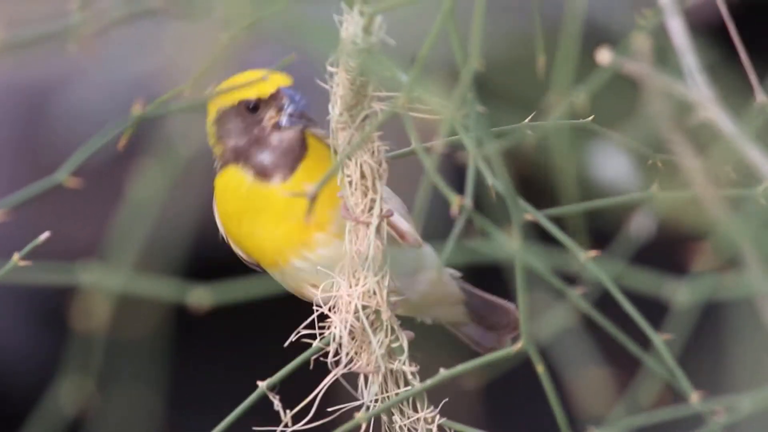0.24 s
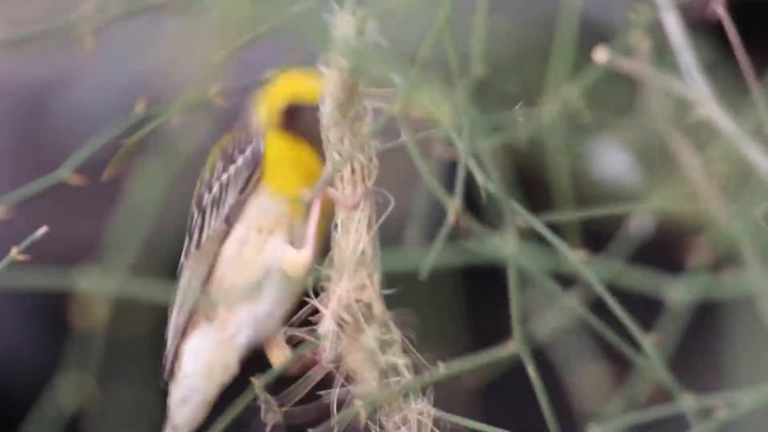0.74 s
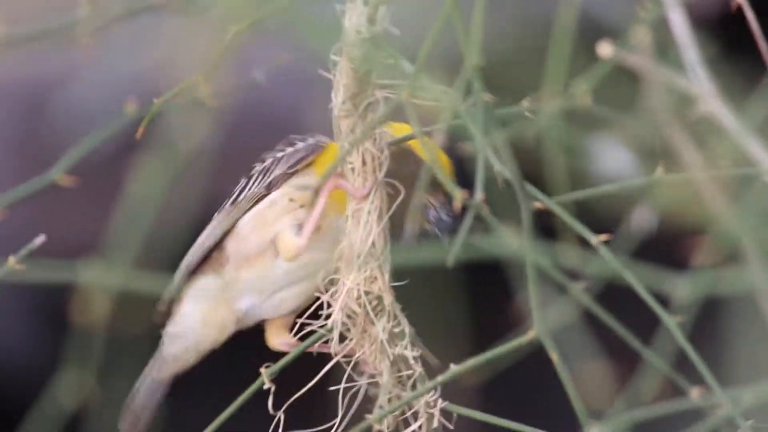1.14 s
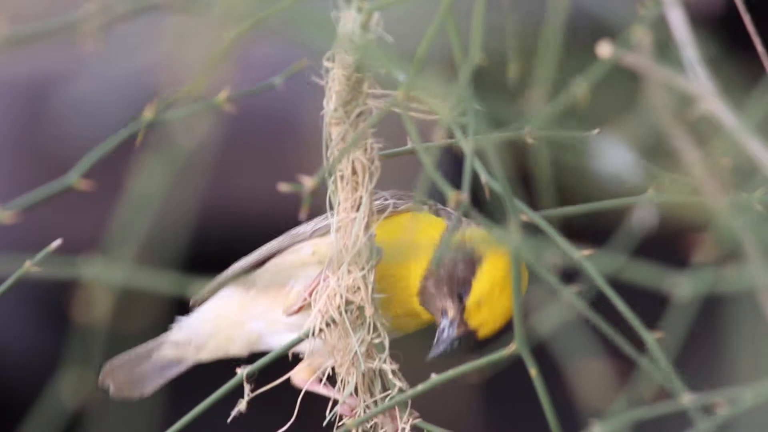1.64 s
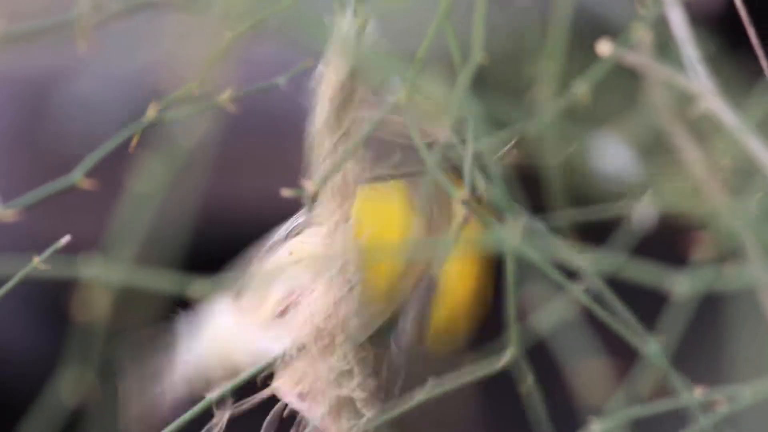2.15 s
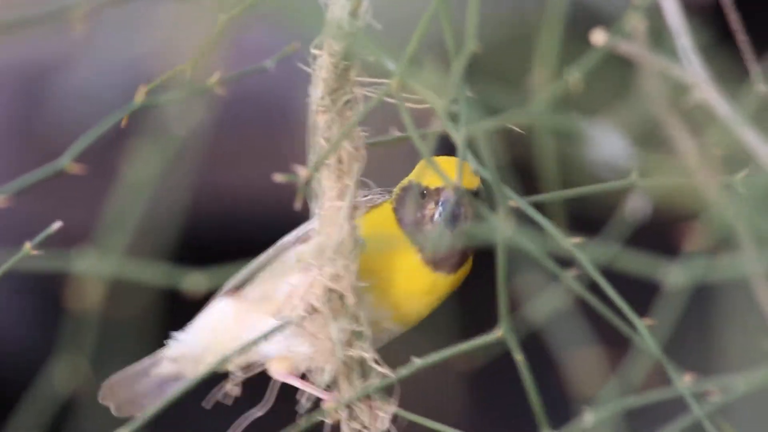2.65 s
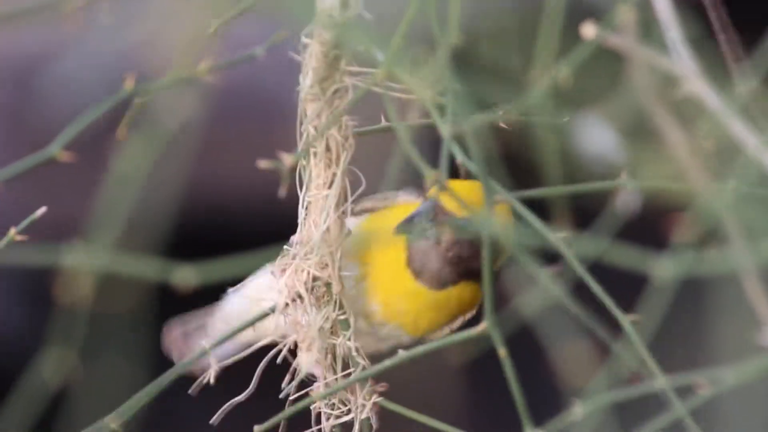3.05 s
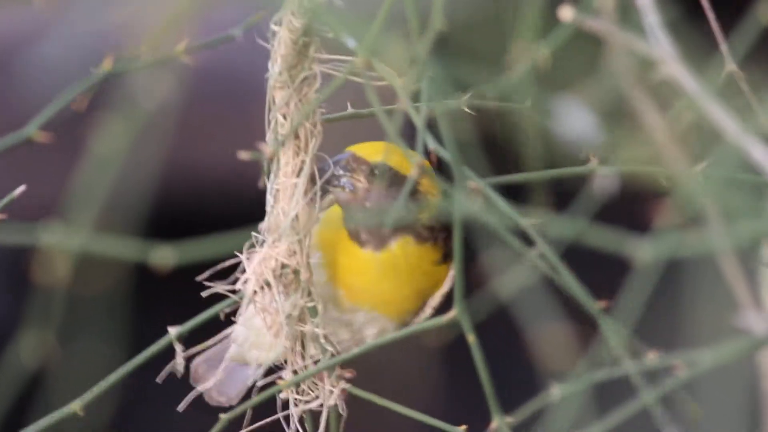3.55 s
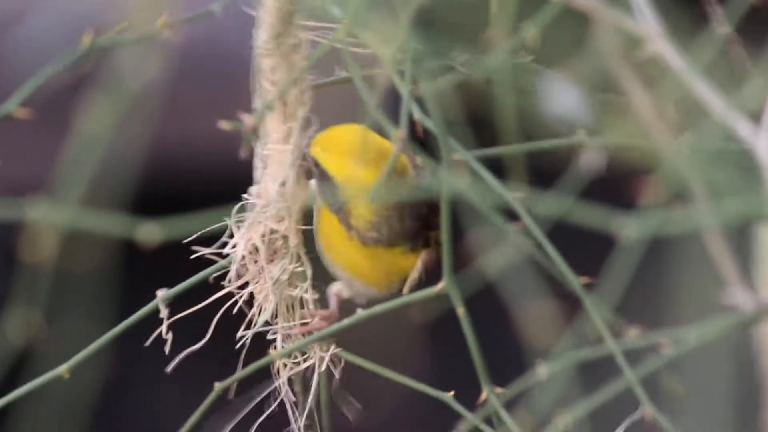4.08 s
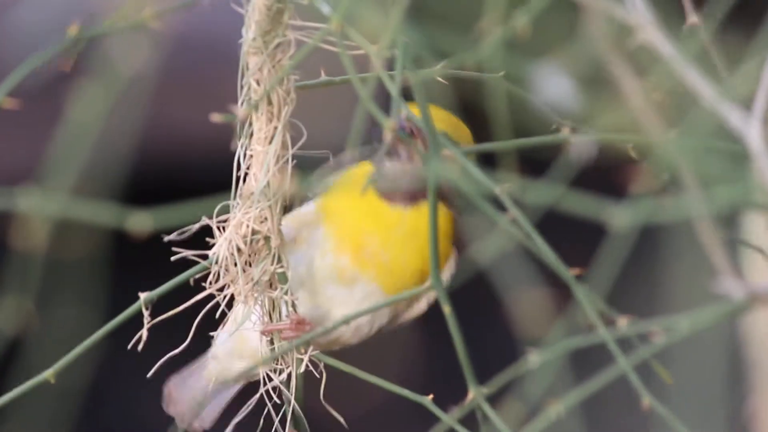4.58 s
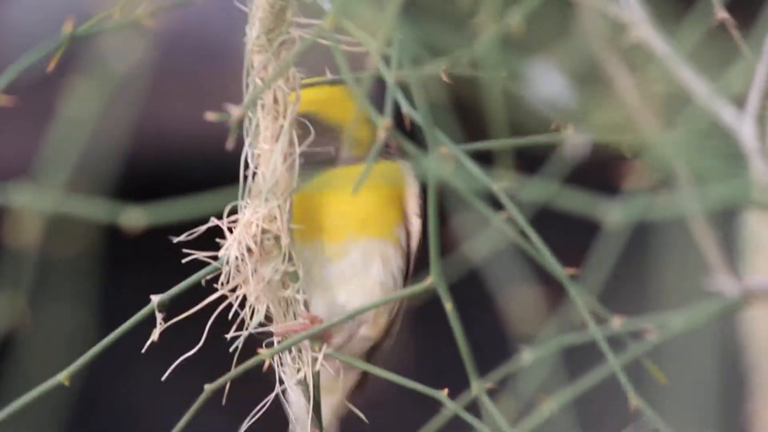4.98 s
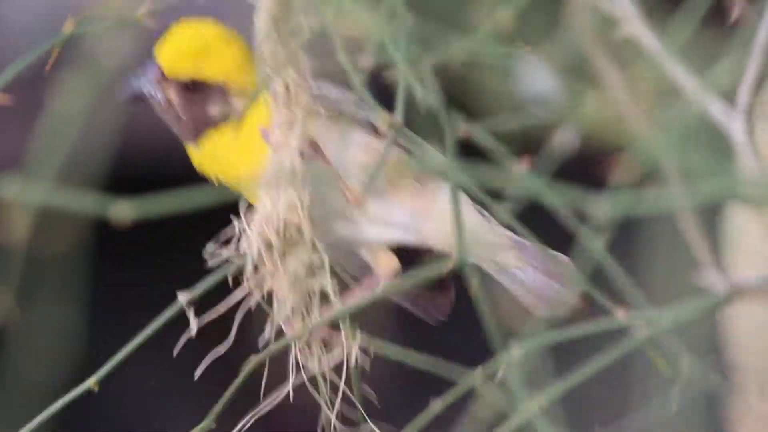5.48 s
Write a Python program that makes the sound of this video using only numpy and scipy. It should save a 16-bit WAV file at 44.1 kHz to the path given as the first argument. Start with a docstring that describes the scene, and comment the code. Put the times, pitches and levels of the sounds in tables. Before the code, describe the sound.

Outdoors among thorny bushes, two small birds repeat very short, buzzy zigzag chirps over a distant chattering flock and a wash of trickling water with small plops. A trilled whistle comes just before three seconds, then rasps, a thin wheezy song and falling whistles crowd in. Stereo microphones, close birds slightly left, light echo from foliage.

```python
"""Zigzag chirps over a wash of trickling water: a colony of weaver birds in thorn bushes, at two microphones.
Two birds repeat the zigzags, others give thin notes, trilled and falling whistles, rasps and a wheezy song.
Calls are pitch curves sung by a tone; rasp and wheeze are irregular slaps filtered by resonances.
A far flock chatters behind, bubbles ring in the water, wind rumbles, and foliage and banks echo the calls."""
import sys
import numpy as np
from scipy import signal
from scipy.fft import rfft, irfft
from scipy.io import wavfile
from scipy.ndimage import uniform_filter1d

SR = 44100
rng = np.random.default_rng(int(sys.argv[2]) if len(sys.argv) > 2 else 0)


def field_ratio(decibels):
    """Amplitude ratio for a level in dB (20 dB per decade); scalars and array-likes work."""
    return 10 ** (np.asarray(decibels, dtype=float) / 20)


def waveform_to_disk(signal):
    """Save audio, clipped to [-1, 1], as 16-bit WAV at the path in sys.argv[1]."""
    frames = np.transpose(np.atleast_2d(signal))
    scaled = np.clip(frames, -1, 1) * 32767
    samples = np.round(scaled).astype(np.int16)
    wavfile.write(sys.argv[1], SR, samples)


N = 252252
T = np.arange(N) / SR

# Turning points of one zigzag chirp, shared by the further caller and the flock, before each call is varied:
# (time from the first peak [s], pitch [Hz], relative level [dB])
CHIRP_ZIGZAG = [(-.007, 3420, -6), (0, 4950, -17), (.008, 4510, -2), (.0105, 3800, -1.5), (.016, 4226, 2),
                (.020, 3950, -4.5), (.023, 4990, -10.5), (.030, 3150, -3.5), (.035, 3800, -9.5),
                (0.047, 3140, -2.5)]


def level(x, db):
    """Root-mean-square normalisation: scale to an rms level in dB."""
    return x * field_ratio(db) / np.sqrt(np.mean(x ** 2))


def band(x, hz, width):
    """Second-order resonance with unit gain at its centre and a bandwidth in Hz."""
    return signal.lfilter(*signal.iirpeak(hz, hz / width, SR), x)


def wobble(rate):
    """Low-passed noise: smooth chance of spread 1 that changes about rate times a second."""
    window = max(int(SR / rate), 1)
    x = uniform_filter1d(uniform_filter1d(rng.standard_normal(N), window), window)
    return x / x.std()


def place(x, pan_db, lag=0):
    """Interaural cues: left minus right level in dB, and a delay of the left microphone in samples."""
    left = np.roll(x, lag) * field_ratio(pan_db / 2)
    right = x * field_ratio(-pan_db / 2)
    return np.array([left, right])


def add(out, s, hz, db, overtone_db=(), edge_s=0.00095, shape=1):
    """Frequency modulation: sing a syrinx tone along a curve of pitch and level into out, with soft edges."""
    i = np.arange(max(int(s[0] * SR), 0), min(int(s[-1] * SR), N))
    t = i / SR
    pitch = uniform_filter1d(np.interp(t, s, hz), size=110, mode="nearest")  # muscles round the turns
    phase = 2 * np.pi * np.cumsum(pitch) / SR
    tone = np.sin(phase)
    for k, overtone in enumerate(overtone_db):
        # the windpipe passes overtones best when the pitch is low
        tone = tone + field_ratio(overtone) * (4000 / pitch) ** 2 * np.sin((k + 2) * phase)
    edge = np.clip(np.minimum(t - s[0], s[-1] - t) / edge_s, 0, 1)
    gain = np.sqrt(2) * field_ratio(np.interp(t, s, db))  # sine amplitude from rms level
    out[i] += tone * edge * gain * np.broadcast_to(shape, N)[i]


def slaps(rate):
    """Aperiodic excitation: random closures of a strained syrinx, rate per second on average, over faint noise."""
    chance = rng.random((2, N))
    closures = (chance[0] < rate / SR) * (chance[1] - .5)
    return closures + 0.072 * rng.standard_normal(N)


def twigs(x, smear_db):
    """Short-range scattering: close twigs spread a call over a few milliseconds."""
    decay_s = .0045
    t = np.arange(int(4 * decay_s * SR)) / SR
    scatter = rng.standard_normal(len(t)) * np.exp(-t / decay_s)
    scatter = field_ratio(smear_db) * scatter / np.sqrt(np.sum(scatter ** 2))
    return x + signal.fftconvolve(x, scatter)[:N]


def foliage(x, t60_s, tail_db, echo_db):
    """Reverberation: discrete echoes and an exponentially decaying scatter, partly alike left and right, dulled."""
    # banks and trunks: (delay [s], level before echo_db is added [dB])
    reflections = [(0.033, -8.5), (0.061, -5.5), (0.1, -8.5)]
    t = np.arange(SR) / SR
    common, own = rng.standard_normal(SR), rng.standard_normal((2, SR))
    decay = np.exp(-np.log(1000) * t / t60_s)
    onset = np.minimum(t / 0.0032, 1)
    tail = (common + 0.78 * own) * decay * onset
    tail = field_ratio(tail_db) * tail / np.sqrt(np.sum(tail ** 2, axis=1, keepdims=True))
    for s, db in reflections:
        tail[:, int(s * SR)] += field_ratio(db + echo_db)
    wet = signal.fftconvolve(x, tail, axes=1)[:, :N]
    return signal.sosfilt(signal.butter(1, 7000, fs=SR, output="sos"), wet)


def murmur(db):
    """Partial coherence: shaped noise of water and air, partly alike at both microphones, gently swelling."""
    # spectrum of the wash: (frequency [Hz], relative density [dB])
    spectrum = [(18, -53), (30, -16), (187, -7), (324, -12.5), (518, -14), (1330, -5.5), (2620, -4),
                (3230, -4), (4090, 2.5), (4420, -16.5), (5450, -6), (9940, -18), (15500, -33.5)]
    spectrum_hz, spectrum_db = np.transpose(spectrum)
    f = np.maximum(np.fft.rfftfreq(N, 1 / SR), 1)
    gain = field_ratio(np.interp(np.log(f), np.log(spectrum_hz), spectrum_db))
    apart = gain * (f / 2500) ** 0.32  # the treble differs more between the microphones
    mid, left, right = (irfft(rfft(rng.standard_normal(N)) * g, N) for g in (gain, apart, apart))
    wash = place(mid, -6.0) + 1.17 * np.array([left, right])
    swell = field_ratio(.8 * wobble(8) + .8 * wobble(2))
    return level(wash, db) * swell


def thumps():
    """Wind pressure: low resonant noise and two Gaussian puffs, of opposite polarity at the two microphones."""
    # puffs before the microphone gains: (time [s], envelope peak [dB], frequency [Hz])
    puffs = [(0.873, -25.5, 91.4), (1.919, -42, 59)]
    out = np.zeros(N)
    for at, db, hz in puffs:
        t = T - at
        out += field_ratio(db) * np.sin(2 * np.pi * hz * t) * np.exp(-(t / 0.0092) ** 2)
    rumble = band(band(rng.standard_normal(N), 44, 50), 44, 50)
    out += level(rumble, -66)
    return np.array([1.4 * out, -.7 * out])


def bubble(count, db, hz, rise, length):
    """Bubble resonance: a shrinking air pocket has a quick start, a rising pitch and a dying ring."""
    t = np.arange(count) / SR
    f = hz * 2 ** (-rise * np.exp(-2.2 * t / length))
    envelope = np.minimum(t / 0.0027, 1) * np.exp(-(t / length) ** 3)
    return field_ratio(db) * np.sin(2 * np.pi * np.cumsum(f) / SR) * envelope


def water(count=300):
    """Superposed bubble resonances: listed loud bubbles and a random trickle of mostly fainter ones."""
    # (time [s], level before onset and decay [dB], last pitch [Hz], rise [octaves], ring length [s])
    loud_bubbles = [(.334, -26, 887, 0.72, 0.0068), (.858, -28.5, 947, 0.75, 0.0056),
                    (1.352, -24.5, 838, 0.34, 0.0057), (1.48, -40, 396, 0.14, 0.042),
                    (1.535, -42.5, 886, 1.02, 0.048), (2.045, -49.5, 595, 0.1, 0.082),
                    (2.328, -28.5, 1070, 2.1, 0.021), (2.375, -36.5, 965, 0.12, 0.044),
                    (2.468, -32.5, 356, 0.061, 0.018), (3.787, -31.5, 962, 0.59, 0.0094),
                    (3.828, -38.5, 629, 0.43, 0.039), (3.955, -42, 837, 0.175, 0.05),
                    (4.285, -27.5, 710, 2.7, 0.0036), (4.666, -28, 900, 0.24, 0.0044),
                    (5.006, -35.5, 585, 1.25, 0.007), (5.497, -28, 685, 0.93, 0.0037),
                    (5.599, -23, 842, 0.42, 0.0032)]
    bubbles = list(loud_bubbles)
    for a, b, c, d in rng.random((count, 4)):
        bubbles.append((a * N / SR, -53 + 13 * b ** 3, 400 * 2 ** (2.05 * c), 0.739 * d, 0.0094 + 0.0249 * d ** 2))
    out, size = np.zeros(N + SR), SR // 6
    for at, *row in bubbles:
        start = int(at * SR)
        out[start:start + size] += bubble(size, *row)
    return out[:N]


def flock(count=480):
    """Superposition of many voices: zigzags at random moments, pitches and lengths merge into chatter."""
    # loudness course before the paths to the microphones: (time [s], level [dB])
    course = [(0, -35.5), (.3, -34), (.55, -35), (1.5, -35.5), (1.9, -40.5), (2.4, -31.5), (2.7, -38),
              (3.4, -33.5), (4.5, -30), (5.0, -27.5), (5.6, -27.5), (5.72, -30)]
    # weight of a voice by its pitch: (frequency [Hz], gain [dB])
    colour = [(2500, -6.5), (3100, -2), (4100, 0), (4800, 6.5), (6200, 12), (9000, -19)]
    out, (s, hz, db) = np.zeros((2, N)), np.transpose(CHIRP_ZIGZAG)
    colour_hz, colour_db = np.transpose(colour)
    for at, pitch, stretch, size, side in rng.random((count, 5)):
        f = hz * (.85 + .3 * pitch ** 2)
        weight_db = np.interp(np.log(f), np.log(colour_hz), colour_db)
        add(out[int(side > .5)], at * N / SR + s * (.7 + .7 * stretch), f, .5 * db + 4 * size + weight_db)
    return level(out, 0) * field_ratio(np.interp(T, *np.transpose(course)))


def scolds():
    """Broadband resonance: irregular slaps rasp through an open beak, dulled by leaves."""
    # harsh rasps: (start [s], length [s], level before gating and dulling [dB], centre [Hz])
    rasps = [(3.016, 0.086, -30.5, 6470), (3.196, 0.14, -34, 7000), (3.199, 0.15, -36.5, 2200),
             (3.427, 0.092, -30, 5300), (3.61, 0.12, -30.5, 5600), (3.8, 0.12, -31.5, 5470),
             (4.027, 0.1, -34.5, 6040), (4.592, 0.07, -25.5, 5100), (4.923, 0.049, -28.5, 6280),
             (5.136, 0.14, -30.5, 6010), (5.31, 0.068, -27.5, 5400), (5.416, 0.14, -31, 5400),
             (5.623, 0.11, -29.5, 4830)]
    out, source = np.zeros(N), slaps(3500)
    for at, length, db, hz in rasps:
        gate = np.clip(np.minimum(T - at, at + length - T) / .02 + .3, 0, 1)
        out += gate * level(band(source, hz, 0.34 * hz ** 2 / 5500), db)
    dull = signal.sosfilt(signal.butter(1, 10000, fs=SR, output="sos"), out)
    return dull * field_ratio(2.5 * wobble(150))


def wheeze():
    """Source and filter: irregular slaps, bunched into a rapid uneven buzz, ring the throat resonances."""
    # loudness course of the song, before its wobble: (time [s], gain [dB])
    course = [(3.39, -48), (3.5, -35.5), (4.55, -37), (4.62, -35), (5.02, -37.5), (5.3, -31), (5.58, -44),
              (5.72, -32)]
    # throat resonances: (centre [Hz], nominal width [Hz], level [dB])
    throat = [(2248.5, 147, -10.5), (2807, 69.3, -24), (3130, 470, -3), (3800, 300, -3.5), (4310, 360, 0.5),
              (5570, 310, 2), (7000, 90, -8.5), (10500, 2100, -12)]
    buzz_hz = 260 * (1 + .2 * wobble(20))
    buzz = np.sin(np.pi * np.cumsum(buzz_hz) / SR) ** 2
    source = slaps(2600) * (.03 + buzz ** 3)
    voice = np.zeros(N)
    for hz, width, db in throat:
        ring = band(band(source, hz, 1.16 * width), hz, 3.1 * width)
        voice += field_ratio(db) * level(ring, 0)
    return field_ratio(np.interp(T, *np.transpose(course), left=-90) + 2.5 * wobble(30)) * voice


def whistles():
    """Amplitude and frequency modulation: a trill closes the voice at a steady rate; hoarse tones sputter."""
    # trilled whistle before modulation, a scoop up and a slow sag: (time [s], pitch [Hz], level [dB])
    trill = [(2.631, 2755, -38), (2.69, 2780, -40), (2.718, 2960, -28.5), (2.772, 3130, -23.5),
             (2.869, 3184, -22), (2.944, 3167, -22), (2.972, 3103, -25), (3.02, 3045, -21),
             (3.043, 3074, -29.5), (3.066, 3078, -46), (3.1, 3050, -29), (3.149, 3074, -44)]
    # pure whistles, falling, level or hooking down, one list each: (time [s], pitch [Hz], level [dB])
    clear_tones = [
        [(0.928, 3390, -24), (0.945, 4400, -29), (0.975, 3850, -25), (0.992, 3800, -29)],
        [(2.26, 5600, -45), (2.305, 5480, -37), (2.322, 4800, -31)],
        [(3.21, 3783, -28), (3.31, 3764, -27), (3.36, 3680, -45)],
        [(4.955, 3010, -41), (4.98, 2410, -38), (5.0, 2080, -44), (5.052, 2020, -35)],
    ]
    # hoarse whistles, one list each: (time [s], pitch [Hz], level [dB])
    hoarse_tones = [
        [(3.446, 4065, -37), (4.0, 4310, -35), (4.6, 4448, -40.5)],
        [(4.668, 4865, -36), (4.708, 4860, -24), (4.722, 4610, -26), (4.76, 4420, -21.5), (4.80, 4220, -22),
         (4.85, 4000, -21.5), (4.875, 4060, -26), (4.93, 3960, -37)],
        [(5.198, 5650, -26), (5.22, 5230, -25.5), (5.24, 4680, -27), (5.264, 4150, -24), (5.286, 4780, -24),
         (5.302, 4230, -22)],
        [(5.311, 4430, -24), (5.35, 4060, -23), (5.39, 3950, -24), (5.42, 3880, -24.5), (5.45, 3800, -25.5),
         (5.47, 3834, -35)],
        [(5.486, 3520, -32), (5.505, 3800, -25), (5.525, 3620, -28), (5.56, 3800, -43)],
    ]
    out = np.zeros(N)
    trill_hz, swing_hz, depth = 57.5, 55, 0.94
    turn = 2 * np.pi * trill_hz * (T - 2.872)  # a beat is fullest at 2.872 s
    trilling = np.clip(np.minimum((T - 2.754) / 0.03, (2.96 - T) / 0.0073), 0, 1)
    s, hz, db = np.transpose(trill)
    span = (T > s[0]) & (T < s[-1])
    pitch = np.interp(T, s, hz) - swing_hz * trilling * np.sin(turn)  # each beat slides down
    closing = 1 - trilling * depth * (.5 - .5 * np.cos(turn))
    add(out, T[span], pitch[span], np.interp(T[span], s, db), edge_s=0.0041, shape=closing)
    for rows in clear_tones:
        add(out, *np.transpose(rows), edge_s=0.008, shape=field_ratio(1.4 * wobble(150)))
    hoarse = .34  # share 0-1
    sputter = np.sqrt(1 - hoarse ** 2) + hoarse * wobble(520)
    for rows in hoarse_tones:
        add(out, *np.transpose(rows), edge_s=0.0023, shape=sputter)
    return out


def notes():
    """Frequency glides: short fluttering arches and slides, each from one of two places at random."""
    # bends that return: (start [s], length [s], end pitch [Hz], turn pitch [Hz], level before flutter [dB])
    arches = [(0.297, 0.026, 3010, 4280, -27.5), (0.719, 0.056, 5690, 7470, -31),
              (0.805, 0.032, 5920, 6400, -29), (0.94, 0.036, 4560, 4920, -29),
              (1.291, 0.019, 4270, 5090, -30), (1.396, 0.074, 5730, 7160, -30),
              (1.911, 0.045, 5640, 7310, -29), (2.35, 0.02, 3700, 3190, -32),
              (2.89, 0.044, 5570, 7100, -28.5), (3.482, 0.044, 5980, 7320, -30),
              (4.634, 0.01, 4780, 5280, -17.5), (5.462, 0.037, 4660, 4080, -23.5),
              (5.515, 0.035, 4520, 4040, -28.5)]
    # slides and level peeps: (start [s], length [s], first pitch [Hz], last pitch [Hz], level before flutter [dB])
    slides = [(0.006, 0.023, 6260, 6020, -25), (0.324, 0.023, 3060, 4560, -25),
              (0.594, 0.0097, 1687, 1367, -36.5), (0.7, 0.019, 1303, 1720, -32),
              (0.36, 0.019, 3650, 2840, -31), (1.49, 0.042, 5840, 7130, -30.5),
              (1.658, 0.024, 6194, 6010, -27), (1.995, 0.029, 5300, 7180, -31.5),
              (2.117, 0.015, 5700, 5400, -36), (2.205, 0.02, 5645, 5390, -39),
              (2.378, 0.014, 3070, 4250, -26), (2.42, 0.021, 4270, 3130, -27),
              (3.27, 0.035, 6770, 6160, -28), (3.32, 0.018, 5864, 3850, -24.5),
              (3.47, 0.018, 7600, 5350, -24.5), (3.58, 0.069, 7020, 6370, -28.5),
              (3.657, 0.028, 5700, 4000, -34), (3.685, 0.011, 7770, 5840, -26.5),
              (3.857, 0.01, 7850, 6760, -32), (3.997, 0.0092, 7500, 6030, -29),
              (4.065, 0.018, 8520, 5810, -33), (4.092, 0.012, 7950, 5220, -31),
              (5.09, 0.031, 5630, 5420, -28), (4.735, 0.021, 4150, 3460, -24),
              (4.86, 0.033, 6400, 6100, -26.5), (5.155, 0.047, 7480, 6700, -31),
              (5.21, 0.028, 4200, 4230, -27), (5.5, 0.016, 5270, 5370, -27),
              (5.545, 0.0092, 5470, 5440, -31), (5.25, 0.029, 6900, 6750, -32),
              (5.278, 0.0081, 5460, 5430, -29), (5.3, 0.01, 5640, 5460, -24),
              (5.316, 0.014, 5330, 5290, -19), (5.35, 0.015, 5210, 5140, -24),
              (5.405, 0.013, 5440, 5290, -27), (5.418, 0.011, 6060, 6050, -28),
              (5.422, 0.023, 4530, 4940, -25), (5.65, 0.011, 7800, 6730, -32.5),
              (5.65, 0.016, 5800, 5900, -32), (5.665, 0.016, 4600, 4740, -25),
              (5.688, 0.026, 5470, 5350, -25)]
    out, u = np.zeros((2, N)), np.linspace(0, 1, num=12)
    flutter = field_ratio(3 * wobble(400) + 2 * wobble(120) - 2.5)
    arch = 1 - abs(2 * u - 1) ** 2.4
    for rows, glide in ((arches, arch), (slides, u)):
        for (at, length, a, b, db), side in zip(rows, rng.random(len(rows))):
            pitch = a + (b - a) * glide
            add(out[int(side > .5)], at + u * length, pitch, db + 0 * u, edge_s=0.08 * length, shape=flutter)
    return place(twigs(out[0], -12), -4) + place(twigs(out[1], -12), -1.5, lag=2)


def caller(zigzag, chirps, overtone_db, flutter_db, breath_db):
    """Tone plus turbulence: a varied zigzag repeats, leaves make it flutter and breath noise blurs its top."""
    out, (s, hz, db) = np.zeros(N), np.transpose(zigzag)
    for at, top_db, pitch, stretch in chirps:
        add(out, at + s * stretch, hz * pitch, db + top_db, overtone_db)
    envelope = np.sqrt(uniform_filter1d(out ** 2, size=200).clip(0))
    breath = level(band(slaps(2700), 5100, 5400), breath_db) * envelope
    return out * field_ratio(flutter_db * wobble(600)) + breath


def far_caller():
    """Frequency-modulated tone: the further bird, whose pitch scatters by chance and whose overtone is faint."""
    # (time [s], level added to the zigzag [dB])
    far_times = [(-0.014, -20), (0.172, -22), (0.384, -23.5), (0.764, -22.5), (0.978, -22.5),
                 (1.189, -23.5), (1.464, -23), (1.692, -22), (1.942, -23), (2.148, -24.5), (2.318, -26),
                 (2.499, -24.5), (2.901, -23.5), (3.152, -27), (3.361, -23.5), (3.526, -24.5),
                 (3.687, -25.5), (3.889, -26.5)]
    chirps = [(at, db, 1 + 0.014 * rng.standard_normal(), 1) for at, db in far_times]
    call = caller(CHIRP_ZIGZAG, chirps, overtone_db=(-28,), flutter_db=2, breath_db=-32)
    return twigs(call, -13)


def near_caller():
    """Frequency-modulated tone: the nearer bird, with stronger overtones, more breath and more scatter."""
    # one chirp before it is varied: (time from its peak [s], pitch [Hz], relative level [dB])
    near_zigzag = [(-.009, 3400, -1), (.002, 5450, 4.5), (.008, 4400, -1), (.014, 3522, -0.5),
                   (.018, 3920, 3), (.022, 3650, 7), (.030, 5200, 1), (.038, 2800, -4), (.046, 3300, 6)]
    # (time [s], level added to the zigzag [dB], pitch factor [1], length factor [1])
    near_times = [(0.257, -30, 1.01, 1.01), (0.562, -28.5, 1.01, 0.99), (0.786, -30, 1.12, 0.84),
                  (1.228, -30, 1.05, 1.05), (1.51, -30.5, 1.07, 0.83), (2.449, -30.5, 0.99, 1.04),
                  (2.722, -28.5, 0.95, 1.04), (2.989, -26.5, 1.065, 1.01), (3.144, -27.5, 1.0, 1.1),
                  (3.817, -33, 0.98, 1.35), (4.61, -36.5, 1.67, 0.84), (4.928, -40.5, 0.89, 0.88)]
    call = caller(near_zigzag, near_times, overtone_db=(-11, -22), flutter_db=3, breath_db=-12.5)
    return twigs(call, -7)


def scene():
    """Direct and reverberant sound: near voices direct and echoed, the flock mostly as scatter."""
    left, right = flock()
    far = place(left, -1.7) + place(right, 0.74, lag=-2)
    far = field_ratio(-6) * far + foliage(far, t60_s=.8, tail_db=-2, echo_db=-4)
    drops = place(water(), -5)
    drops = drops + foliage(drops, t60_s=.3, tail_db=-9, echo_db=-4)
    birds = place(scolds(), -2.64) + place(wheeze(), -3, lag=1) + notes()
    birds = birds + place(far_caller(), -8.5) + place(near_caller(), -0.85, lag=1)
    open_air = place(whistles(), -7)  # less of it reaches the foliage
    echoed = foliage(birds + field_ratio(-9) * open_air, t60_s=.6, tail_db=-5.5, echo_db=-6)
    return murmur(-31.5) + thumps() + drops + far + birds + open_air + echoed


def roll_off(x):
    """The treble ends steeply here."""
    return signal.sosfilt(signal.butter(12, 15660, fs=SR, output="sos"), x)


def record(dry):
    """Band limiting: a steep elliptic low-pass cuts the treble above 15.7 kHz."""
    mix = signal.sosfilt(signal.ellip(8, .2, 70, 15700, fs=SR, output="sos"), dry)
    return roll_off(mix)


dry = scene()
out = record(dry)
waveform_to_disk(out)
```